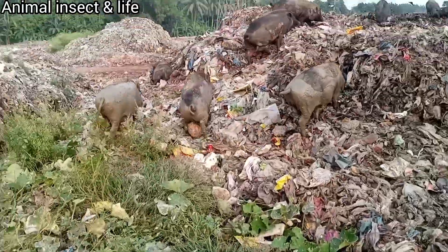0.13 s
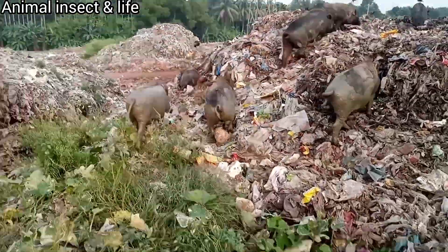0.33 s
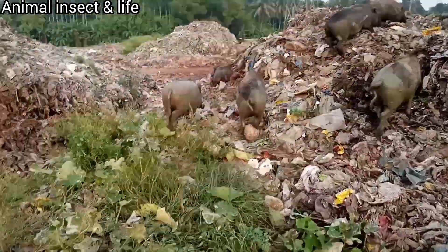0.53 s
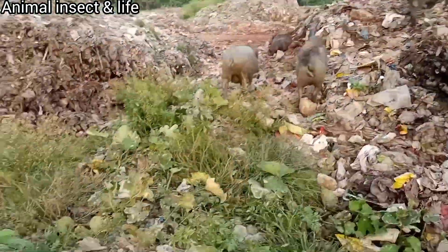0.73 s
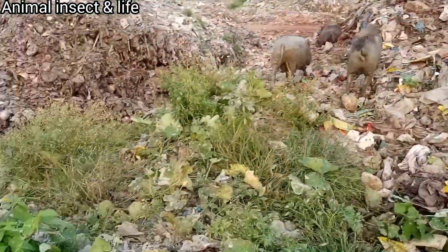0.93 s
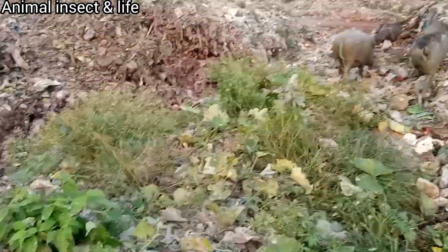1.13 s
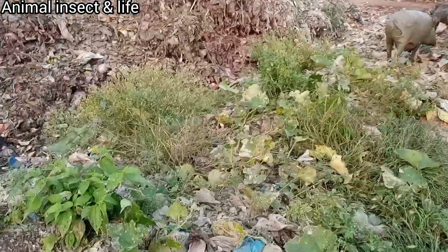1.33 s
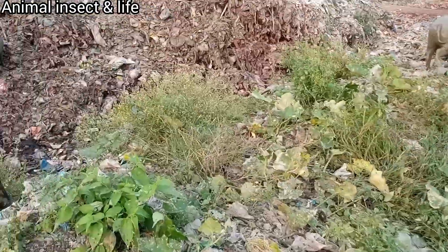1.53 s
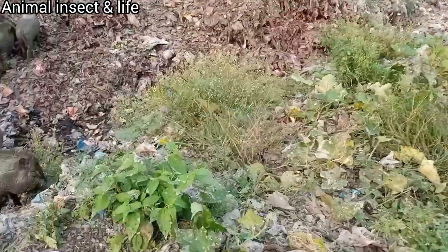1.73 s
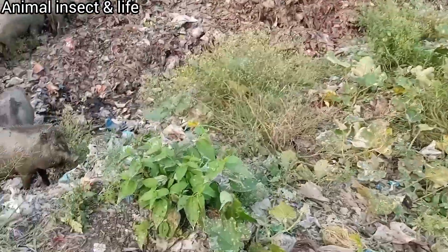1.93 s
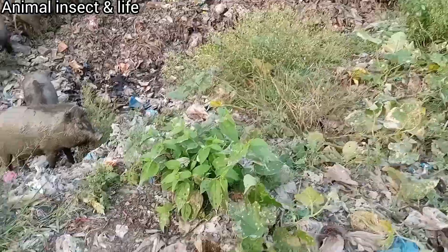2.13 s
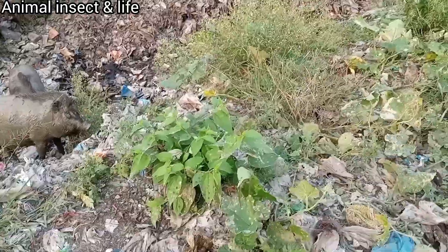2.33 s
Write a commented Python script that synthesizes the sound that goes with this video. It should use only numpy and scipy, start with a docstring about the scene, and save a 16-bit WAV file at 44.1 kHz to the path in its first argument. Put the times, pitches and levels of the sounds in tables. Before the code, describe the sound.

Small birds chirp, whistle, trill and rasp close by at an open rubbish dump. A pig gives a few soft, low grunts while plastic litter crackles, over a wash of distant birds and faint microphone rumble.

```python
"""An open rubbish dump, where pigs root through the litter while small birds chatter close by.
The birds whistle, trill, squawk and rasp by modulating the tone of the syrinx. A pig grunts low as
slow pulses ring its throat, and plastic crackles underfoot; these near sounds echo off the heaps.
Behind them lie the wash of a distant flock, a thin hiss, a low murmur, soft bumps of bass
and an uneven rumble on the microphone."""
import sys
import numpy as np
from scipy import signal
from scipy.fft import rfft, irfft
from scipy.io import wavfile
from scipy.ndimage import uniform_filter1d

SR = 44100
rng = np.random.default_rng(int(sys.argv[2]) if len(sys.argv) > 2 else 0)


def pcm_store(signal):
    """Save signal as 16-bit PCM."""
    levels = np.round(np.clip(np.atleast_2d(signal), -1, 1) * 32767)
    wavfile.write(sys.argv[1], SR, levels.astype(np.int16).T)


N = 104384
T = np.arange(N) / SR


def amp(db):
    return 10 ** (np.asarray(db) / 20)


def unit(x):
    return x / np.sqrt(np.mean(x ** 2) + 1e-20)


def envelope(points):
    """Gain over the whole scene, interpolated between (seconds, dB) points."""
    return amp(np.interp(T, *np.transpose(points)))


def gain_at(spectrum, hz):
    """Gain of a spectrum of (Hz, dB) points, interpolated over log frequency."""
    f, db = np.transpose(spectrum)
    return amp(np.interp(np.log(hz + 1), np.log(f), db))


def colour(x, spectrum):
    """A signal filtered by a spectrum, at unit RMS."""
    return unit(irfft(rfft(x) * gain_at(spectrum, np.fft.rfftfreq(len(x), 1 / SR)), len(x)))


def band(n, hz, octaves):
    """Noise in a bell-shaped band, 12 dB down at `octaves` either side of the centre."""
    away = np.log2((np.fft.rfftfreq(n, 1 / SR) + 1) / hz) / octaves
    return unit(irfft(rfft(rng.standard_normal(n)) / (1 + away ** 2) ** 2, n))


def drift(n, hz):
    """Random fluctuation: noise low-passed at the given rate."""
    lowpass = 1 / (1 + (np.fft.rfftfreq(N, 1 / SR) / hz) ** 4)
    return unit(irfft(rfft(rng.standard_normal(N)) * lowpass, N))[:n]


def phase_of(hz):
    return 2 * np.pi * np.cumsum(hz) / SR


def arch(n):
    return np.sin(np.pi * np.arange(n) / n)


def add(mix, start_s, sound):
    at = round(start_s * SR)
    part = mix[max(at, 0):][:len(sound) + min(at, 0)]
    part += sound[max(-at, 0):][:len(part)]


def contour(points, fade_s=0.0029):
    """Start, local time, smoothed pitch and gain of a call given as (seconds, Hz, dB) points."""
    times, hz, db = np.transpose(points)
    times = np.sort(times)
    start = times[0]
    t = np.arange(0, times[-1] - start + fade_s, 1 / SR)
    fades = np.clip(np.minimum(t, t[-1] - t) / fade_s, 0, 1)
    pitch = uniform_filter1d(np.interp(t + start, times, hz), size=220)
    return start, t, pitch, fades * amp(np.interp(t + start, times, db))


def litter(crackles_per_s=350, crackle_db=-46.5, spread_db=8, rise_s=0.00019):
    """Impulsive excitation: plastic and dry scraps crackle faintly, snap and rustle in clumps."""
    # Spectrum of the crackle. Each row: frequency in Hz, relative level in dB.
    crackle_spectrum = [(300, -1), (1200, -16), (3000, 8.5), (6300, -4.5), (8500, -0.5), (13000, -51.5),
                        (16000, -78)]
    # Each row: start in seconds, centre in Hz, width in octaves, decay in seconds, level in dB.
    snaps = [(.1, 6500, 0.47, 0.0053, -26.5), (.372, 1656, 0.054, 0.0081, -31),
             (0.5076, 6500, 0.38, 0.0068, -26.5), (0.512, 6160, 0.43, 0.0044, -24.5),
             (0.642, 1450, 0.15, .007, -30.5), (0.657, 1160, 0.13, .006, -37),
             (0.7322, 5330, 0.12, .005, -22.5), (.819, 1240, 0.083, .008, -33),
             (.985, 1710, 0.54, 0.0026, -39), (1.48, 6240, 0.11, 0.015, -28),
             (1.482, 1360, 0.57, 0.0073, -26.5), (1.552, 1680, 1, 0.013, -30),
             (1.805, 1620, 0.58, .003, -28.5), (1.9207, 5840, 0.2, .0015, -21.5),
             (1.938, 2090, 0.18, 0.0029, -28), (1.964, 2030, 0.94, 0.0047, -27),
             (2.0076, 7300, 0.14, 0.0016, -21.5), (2.018, 6130, 0.29, 0.0073, -23.5),
             (2.025, 2060, 0.48, 0.0045, -21.5), (2.029, 6080, 0.062, 0.0055, -21),
             (2.0347, 5250, 0.48, 0.0017, -19.5), (2.086, 6200, 0.25, 0.0022, -27),
             (2.1056, 5700, 0.34, 0.0025, -26), (2.115, 5500, 0.39, 0.021, -27.5),
             (2.1716, 6930, 0.37, 0.0016, -22.5), (2.236, 2410, 0.13, .004, -29.5),
             (2.267, 1290, 1, 0.0079, -37)]
    # Litter shoved aside. Each row: start and length in seconds, centre in Hz, width in octaves,
    # level in dB.
    rustles = [(-.03, 0.11, 2300, 1.52, -32), (0.303, 0.044, 5160, 0.54, -28.5),
               (0.636, 0.12, 5800, 0.62, -34.5), (0.933, 0.053, 4000, 0.45, -34),
               (1.055, 0.064, 5970, 0.33, -31.5), (1.146, 0.057, 5770, 0.19, -32.5),
               (1.268, 0.25, 2070, 1.14, -39), (1.256, .19, 6100, 0.14, -38.5),
               (1.485, 0.15, 5930, 0.16, -31), (1.811, 0.093, 6100, 0.12, -36.5),
               (2.193, 0.062, 5500, 0.26, -34), (2.273, 0.16, 1760, 1.08, -31.5)]
    sizes = amp(spread_db * np.minimum(rng.exponential(1, N), 3)) * rng.choice([-1, 1], N)
    impulses = sizes * (rng.random(N) < crackles_per_s / SR)
    out = amp(crackle_db) * colour(impulses, crackle_spectrum)
    t = T[:2048]
    for start, hz, octaves, decay, db in snaps:
        shape = (1 - np.exp(-t / rise_s)) * np.exp(-t / decay)
        crest_factor = shape.max() / np.sqrt(np.mean(shape ** 2))
        add(out, start, amp(db) * unit(shape * band(len(t), hz, octaves)) / crest_factor)
    for start, length, hz, octaves, db in rustles:
        n = int(length * SR)
        clumps = band(N, hz, octaves)[:n] * amp(3.8 * drift(n, 250))
        add(out, start, amp(db) * arch(n) * unit(clumps))
    return out


def distant_flock(level_db=-33, patch_db=3.5):
    """Incoherent summation: far voices merge into a wash of noise, patchy in time and frequency."""
    # Flock and open air. Each row: frequency in Hz, relative spectral density in dB.
    spectrum = [(120, -53), (200, -8), (345, -23.5), (506, -5), (641, -10.5), (1130, -8), (1330, -11.5),
                (1590, -7), (2900, -4.5), (3550, -1), (4920, -5), (5490, -3.5), (6710, -3), (12500, -59),
                (15500, -60)]
    # Swells and lulls. Each row: time in seconds, relative level in dB.
    swell = [(0, 0), (.2, -0.5), (.33, 1), (.48, -1.5), (.7, -1.5), (.9, 0), (1.02, -2.5), (1.12, 1.5),
             (1.21, 0.5), (1.35, 1.5), (1.55, 1.5), (1.75, -2.5), (1.97, .5), (2.16, 0.5), (2.36, 1)]
    frames = dict(nperseg=512, noverlap=384)
    hz, _, cells = signal.stft(rng.standard_normal(N), SR, **frames)
    patches = uniform_filter1d(rng.standard_normal(cells.shape), size=5, axis=0)
    patches = unit(uniform_filter1d(patches, size=12, axis=1))
    cells = cells * gain_at(spectrum, hz)[:, None] * amp(patch_db * patches)
    wash = signal.istft(cells, **frames)[1][:N]
    return amp(level_db) * envelope(swell) * unit(wash)


def hiss():
    """Filtered noise: a thin treble hiss that wavers and fades."""
    # Each row: time in seconds, level in dB.
    levels = [(0, -42), (.12, -52), (.2, -42.5), (.34, -46), (.4, -46.5), (.62, -46.5), (.69, -42),
              (.96, -39), (1.02, -50), (1.5, -50), (1.7, -51.5), (2.36, -61)]
    # Each row: frequency in Hz, relative level in dB.
    spectrum = [(5000, 2), (8000, 5), (10500, -3.5), (13000, -23), (14200, -14), (15300, -3.5)]
    return envelope(levels) * colour(rng.standard_normal(N), spectrum)


def rumble(level_db=-4.5):
    """Amplitude-modulated low noise: uneven lumps of rumble on the microphone."""
    # Each row: time in seconds, relative level in dB.
    lumps = [(0.0, -41), (0.1, -44), (0.14, -66), (0.33, -50), (0.37, -42.5), (0.42, -54), (0.51, -41.5),
             (0.54, -52), (0.68, -39.5), (0.93, -45), (1.13, -47.5), (1.19, -61), (1.22, -51.5),
             (1.51, -40), (1.57, -48.5), (1.75, -48.5), (1.83, -38), (2.23, -56), (2.29, -46), (2.36, -49)]
    # Each row: frequency in Hz, relative level in dB.
    spectrum = [(20, -44), (42, -29), (70, 0.5), (100, 1), (135, -5.5), (200, -9), (400, -35), (1000, -67)]
    return amp(level_db) * envelope(lumps) * colour(rng.standard_normal(N), spectrum)


def murmur():
    """Band-limited noise: the low murmur of the dump comes and goes."""
    # Each row: time in seconds, level in dB.
    levels = [(0, -43.5), (.13, -71.5), (.3, -58), (.53, -54.5), (.62, -44.5), (.95, -57.5), (1.02, -64),
              (1.12, -49), (1.23, -77), (1.33, -44.5), (1.55, -57.5), (1.75, -50.5), (2, -66), (2.1, -71),
              (2.36, -65)]
    return envelope(levels) * band(N, hz=336, octaves=0.47)


def bumps(wobble=0.11):
    """Tone bursts with random frequency modulation: dull, wobbling swells of bass."""
    # Each row: start and length in seconds, pitch in Hz, level in dB.
    bursts = [(0, .11, 108, -40.5), (0.346, 0.059, 95, -45), (0.933, 0.043, 265, -43.5),
              (1.053, 0.13, 87, -55), (1.21, 0.057, 136.5, -45.5), (1.287, 0.079, 126.6, -40.5),
              (1.472, 0.07, 84, -43.5), (1.809, 0.056, 126, -37), (1.825, .05, 257, -47.5),
              (1.932, 0.067, 121, -48), (2.26, 0.082, 145.3, -46.5)]
    out = np.zeros(N)
    for start, length, hz, db in bursts:
        n = int(length * SR)
        tone = np.sin(phase_of(hz * (1 + wobble * drift(n, 37))))
        add(out, start, amp(db) * arch(n) * unit(tone))
    return out


def syrinx(hz, gain, jitter=0.013, flutter_db=2.5):
    """Self-sustained oscillation: a bird's pure tone, slightly unsteady in pitch and level."""
    phase = phase_of(hz * (1 + jitter * drift(len(hz), 300)))
    return np.sqrt(2) * gain * amp(flutter_db * drift(len(hz), 123)) * np.sin(phase)


def whistles():
    """Gliding pure tones: the syrinx follows one pitch contour for each clear whistle."""
    # Each row: one whistle, as points of time in seconds, pitch in Hz, level in dB.
    calls = [
        [(0, 5650, -34), (.02, 4950, -48), (.035, 4050, -24), (.048, 3700, -52)],
        [(.02, 2750, -36), (.055, 2570, -33), (.085, 2440, -36)],
        [(.11, 2360, -43), (.165, 2270, -36.5), (.185, 2250, -43)],
        [(.15, 6050, -55), (.165, 6020, -33), (.18, 5820, -33), (.188, 5400, -36), (.196, 4000, -31)],
        [(.198, 2720, -35), (.232, 2780, -34)],
        [(.228, 4450, -31), (.24, 4500, -30), (.258, 4640, -32), (.27, 4500, -33)],
        [(.23, 3300, -38), (.282, 3100, -40)],
        [(.268, 4720, -33), (.277, 5850, -34), (.293, 6120, -28), (.312, 6100, -25), (.319, 5400, -37),
         (.325, 3700, -22)],
        [(.343, 3750, -33), (.357, 4600, -30), (.37, 5150, -34), (.382, 5100, -33), (.402, 4550, -33),
         (.445, 4000, -35.5), (.48, 3650, -38.5), (.515, 3550, -32), (.54, 3350, -40)],
        [(.401, 4200, -27), (.407, 5550, -28), (.414, 5880, -29), (.424, 5760, -28.5), (.434, 5100, -31.5),
         (.443, 3850, -30)],
        [(.783, 4150, -34), (.8, 4750, -35), (.812, 5230, -26.5), (.828, 5330, -27), (.84, 5300, -53)],
        [(.81, 3250, -28), (.822, 2980, -42), (.836, 4050, -33), (.85, 3900, -37), (.87, 3150, -37)],
        [(.768, 2680, -32), (.79, 2700, -47), (.825, 2750, -30)],
        [(.858, 2680, -39), (.885, 2620, -35), (.91, 2540, -42)],
        [(.908, 4550, -35), (.93, 5050, -37), (.957, 5380, -34), (.985, 5650, -40), (1.015, 5350, -37.5),
         (1.06, 4350, -40), (1.088, 3720, -30.5), (1.101, 3420, -31), (1.13, 3080, -44)],
        [(1.305, 3100, -28), (1.325, 2980, -40.5), (1.34, 3020, -30), (1.35, 2820, -32)],
        [(1.353, 3120, -45), (1.37, 3100, -30), (1.392, 3000, -36)],
        [(1.38, 2330, -47), (1.425, 2400, -33), (1.44, 1900, -54)],
        [(1.608, 3500, -24), (1.615, 2830, -39), (1.635, 2660, -36), (1.665, 2620, -42)],
        [(1.68, 4000, -35), (1.686, 3620, -32.5), (1.71, 3530, -45), (1.722, 3750, -44)],
        [(1.81, 3550, -31.5), (1.824, 3620, -37), (1.838, 3480, -41)],
        [(1.845, 1944, -42), (1.867, 1776, -38.5), (1.897, 1600, -45)],
        [(2.185, 3200, -54), (2.215, 3220, -41), (2.229, 3230, -29.5), (2.24, 3100, -41)],
    ]
    out = np.zeros(N)
    for points in calls:
        start, _, hz, gain = contour(points)
        add(out, start, syrinx(hz, gain))
    return out


def trill(rate_hz=47.5, pitch_depth=0.081, gain_depth=0.31):
    """Periodic modulation: a whistle's pitch and level swing in step."""
    # Each row: time in seconds, centre pitch in Hz, level in dB.
    points = [(0, 2980, -31), (.04, 3110, -36), (.085, 3233, -27.5), (.128, 3216, -30), (.152, 3090, -44)]
    out = np.zeros(N)
    start, t, hz, gain = contour(points)
    swing = np.cos(2 * np.pi * rate_hz * t)
    add(out, start, syrinx(hz * (1 + pitch_depth * swing), gain * (1 + gain_depth * swing)))
    return out


def flicks(bend=1.58):
    """Frequency sweeps: the syrinx darts up or down, slowing towards its final pitch."""
    # Each row: start and length in seconds, first and last pitch in Hz, level in dB.
    sweeps = [(0.237, 0.042, 4300, 3800, -37), (0.436, .016, 5130, 3850, -44),
              (0.555, 0.0163, 5030, 5800, -35), (.812, 0.029, 4800, 4200, -33),
              (0.905, .014, 3970, 2720, -32), (0.965, 0.02, 4230, 2880, -43),
              (1.111, 0.014, 5270, 4160, -33.5), (1.529, 0.0126, 6000, 7150, -27),
              (1.543, 0.02, 5200, 7120, -27.5), (1.574, 0.017, 4680, 6410, -23),
              (1.597, 0.037, 4300, 6100, -25.5), (1.636, .023, 4020, 5750, -27),
              (1.659, 0.016, 4050, 4680, -31), (1.713, 0.014, 6860, 6270, -32),
              (1.786, 0.017, 4100, 4400, -33), (2.058, 0.013, 3500, 2900, -41)]
    out = np.zeros(N)
    for start, length, first_hz, last_hz, db in sweeps:
        progress = np.linspace(0, 1, int(length * SR))
        hz = last_hz - (last_hz - first_hz) * (1 - progress) ** bend
        add(out, start, syrinx(hz, amp(db) * np.sin(np.pi * progress)))
    return out


def squawks(pitch_depth=0.084, jitter=0.021):
    """Formant filtering: a bird's throat shapes a fluttering harmonic series into a nasal call."""
    # Each row: flutter rate in Hz, throat spectrum as points of frequency in Hz and relative dB,
    # contour as points of time in seconds, fundamental in Hz and level in dB.
    calls = [ (94, [(500, -30), (1100, -30), (1600, 0.5), (2200, -5), (6000, -18)], [(.515, 535, -43.5),
             (.6, 546, -38), (.64, 504, -40)]), (82, [(560, -4), (1130, -0.5), (1700, -2), (2300, -0.5),
             (2900, 0), (4200, 2), (7000, -10)], [(.64, 592, -31), (.665, 577, -32), (.75, 556.3, -35),
             (.8, 584, -43)]), (80.9, [(500, -25), (1050, -6.5), (1570, -0.5), (2080, 5.5), (2700, -28),
             (3600, -8), (6000, -27), (8000, -30)], [(1.645, 490, -37.5), (1.69, 518.8, -33.5),
             (1.74, 532, -33.5), (1.81, 513, -35.5), (1.85, 491, -34.5), (1.895, 424, -43)])]
    out = np.zeros(N)
    for rate, throat, points in calls:
        start, t, hz, gain = contour(points)
        flutter = pitch_depth * np.sin(2 * np.pi * rate * t)
        phase = phase_of(hz * (1 + flutter + jitter * drift(len(t), 230)))
        harmonics = sum(gain_at(throat, k * hz) * np.sin(k * phase) for k in range(1, 14))
        add(out, start, gain * unit(harmonics))
    return out


def rasps(gain_depth=0.34):
    """Roughness from fast modulation: a flutter swings and chops a partly noisy bird tone."""
    # Each row: flutter rate, pitch swing and noise width in Hz, noise share of the power from 0 to 1,
    # contour as points of time in seconds, centre pitch in Hz and level in dB.
    calls = [ (95.2, 530, 860, 0.39, [(.545, 3826, -37), (.6, 3900, -39), (.645, 4020, -31)]),
             (113.2, 98, 160, 0.18, [(.645, 3620, -29.5), (.685, 3690, -32.5), (.712, 3630, -32.5),
             (.732, 2990, -32.5), (.775, 3750, -49)]), (83.8, 176, 2100, 0.86, [(1.27, 3700, -32.5),
             (1.31, 3735, -32), (1.38, 3960, -55)]), (103.5, 110, 420, 0.59, [(1.39, 3000, -40),
             (1.44, 3350, -33.5), (1.472, 3650, -27.5), (1.49, 3840, -32.5)]),
             (136.7, 110, 230, 0.33, [(1.488, 4100, -31), (1.51, 4520, -26.5), (1.545, 4565, -23.5),
             (1.57, 4440, -26), (1.6, 3790, -36)]), (90, 88, 310, 0.61, [(2.04, 3200, -56),
             (2.085, 3506, -37.5), (2.135, 3850, -41.5)]), (76, 98, 120, 0.16, [(2.255, 3750, -41.5),
             (2.29, 3700, -33.5), (2.32, 3640, -32), (2.36, 3450, -48)])]
    out = np.zeros(N)
    for rate, swing_hz, width, share, points in calls:
        start, t, hz, gain = contour(points)
        n = len(t)
        flutter_phase = phase_of(rate * (1 + 0.056 * drift(n, 43)))
        noise = drift(n, width) + 1j * drift(n, width)
        amplitude = np.sqrt(2 * (1 - share)) + np.sqrt(share) * noise
        carrier = np.exp(1j * phase_of(hz - swing_hz * np.sin(flutter_phase)))
        throb = 1 + gain_depth * np.cos(flutter_phase)
        add(out, start, gain * unit((amplitude * carrier).real * throb))
    return out


def pig_grunts(jitter=0.13, roughness=0.29, peak_share=0.44, snout_hz=3000):
    """Source and filter: uneven pulses and puffs ring the throat; a closed mouth damps the treble."""
    # Each row: start and length in seconds, pulse rate in Hz, level in dB, mouth tilt in dB per octave.
    grunts = [(0.602, 0.2, 78.2, -34.5, 1), (.72, 0.17, 71.44, -39.5, 0), (1.28, 0.23, 65.8, -49.5, -6),
              (1.81, 0.29, 59.63, -44, -0.5)]
    # Throat and snout resonances. Each row: centre and width in Hz, relative level in dB.
    formants = [(153, 92, 3), (366, 68, -3), (618, 89, -0.5), (1161, 33, -5), (2330, 230, -7)]
    lowest_hz = formants[0][0]
    out = np.zeros(N)
    for start, length, hz, db, tilt in grunts:
        n = int(length * SR)
        cycle = phase_of(hz * (1 + jitter * drift(n, 55.2))) / (2 * np.pi) % 1
        pulses = unit(1. * (np.diff(cycle, prepend=0) < 0))  # one impulse as each cycle begins
        puffs = unit(np.exp(-cycle / 0.083) * rng.standard_normal(n))
        drive = (1 - roughness) * pulses + roughness * puffs
        f = np.fft.rfftfreq(n, 1 / SR)
        throat = sum(amp(level + tilt * np.log2(centre / lowest_hz)) / (1 + 1j * (f - centre) / width) ** 2
                     for centre, width, level in formants)
        passband = f ** 2 / (f ** 2 + 70 ** 2) / (1 + (f / snout_hz) ** 4)
        swell = np.interp(np.arange(n) / n, [0, peak_share, 1], [0, 1, 0])
        add(out, start, amp(db) * swell * unit(irfft(rfft(drive) * throat * passband, n)))
    return out


def heap_echoes(x, level_db=-9.5, t60_s=0.26, echoes_per_s=2000):
    """Scattering: the rubbish heaps return short random echoes that decay exponentially."""
    t = T[:16384]
    taps = rng.standard_normal(len(t)) * (rng.random(len(t)) < echoes_per_s / SR)
    taps *= (t > .004) * amp(-60 * t / t60_s)
    return amp(level_db) * signal.fftconvolve(x, taps / np.linalg.norm(taps))[:N]


def scene():
    """Superposition: the near sources and their echoes add to the background, in one channel."""
    background = distant_flock() + hiss() + rumble() + murmur()
    near = litter() + whistles() + flicks() + trill() + rasps() + squawks() + pig_grunts()
    return (near + heap_echoes(near) + background + bumps())[None]


def record(dry, cutoff_hz=15750):
    """Band limiting: a steep low-pass filter removes the highest treble."""
    lowpass = signal.firwin(511, cutoff_hz, window=("kaiser", 9), fs=SR)
    return signal.oaconvolve(dry, lowpass[None], "same")


dry = scene()
out = record(dry)
pcm_store(out)
```